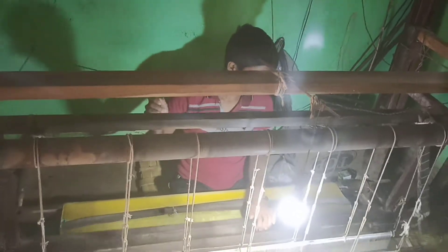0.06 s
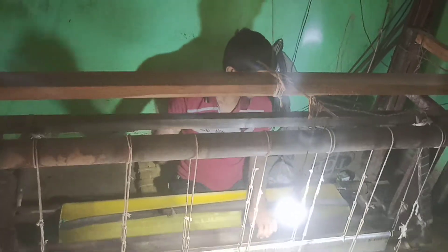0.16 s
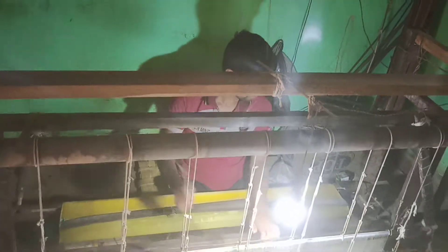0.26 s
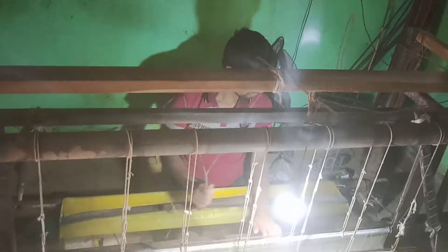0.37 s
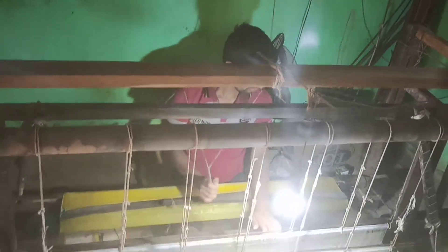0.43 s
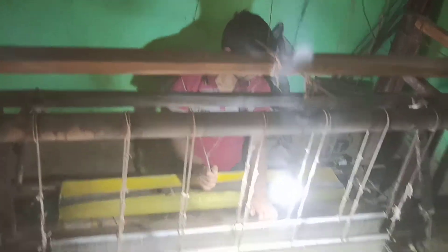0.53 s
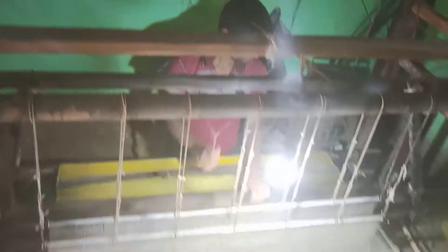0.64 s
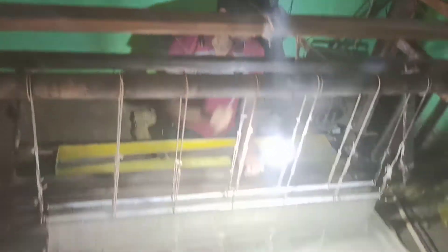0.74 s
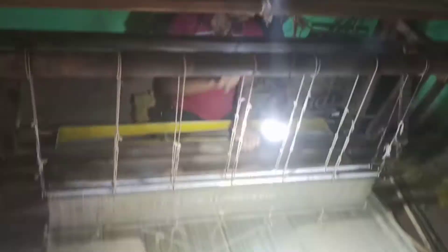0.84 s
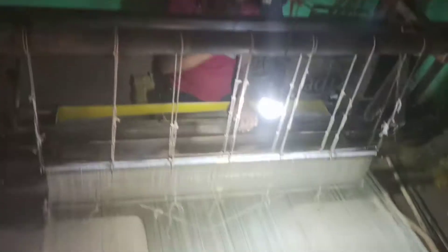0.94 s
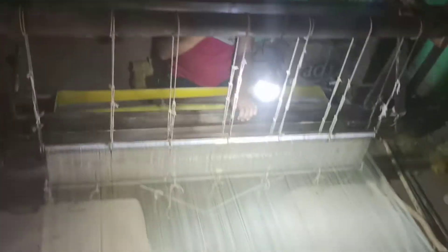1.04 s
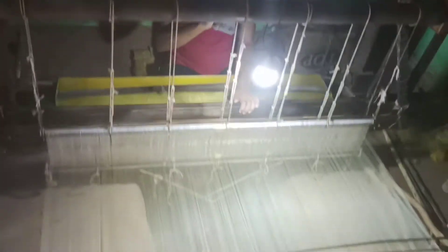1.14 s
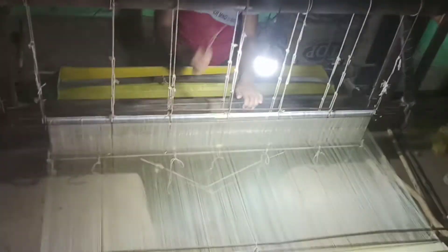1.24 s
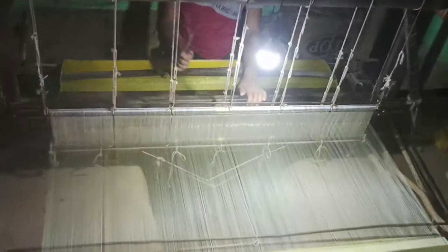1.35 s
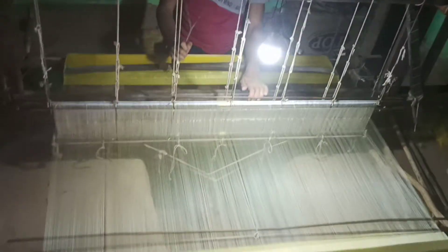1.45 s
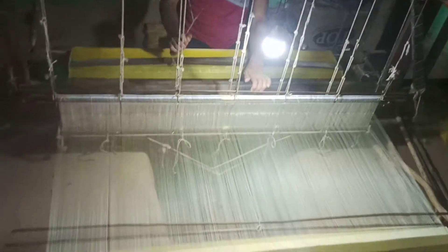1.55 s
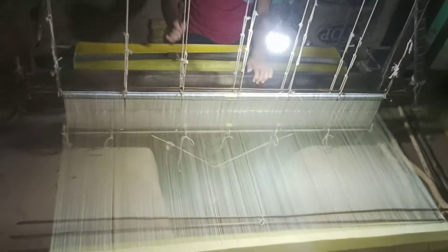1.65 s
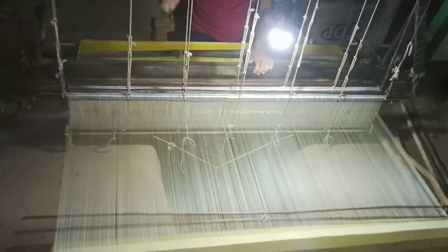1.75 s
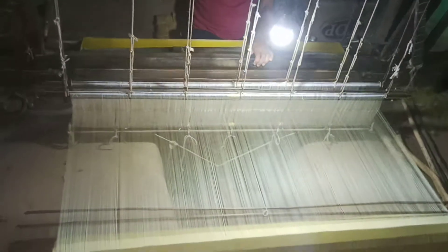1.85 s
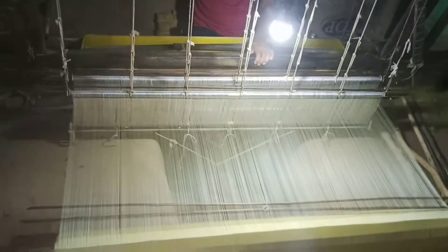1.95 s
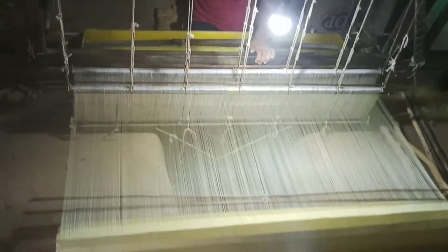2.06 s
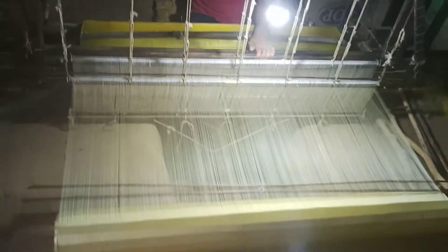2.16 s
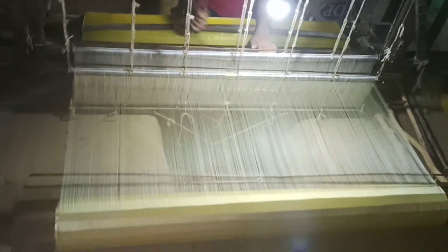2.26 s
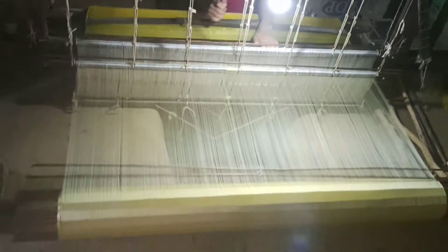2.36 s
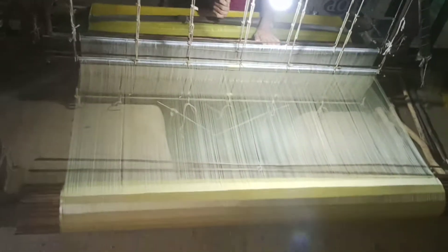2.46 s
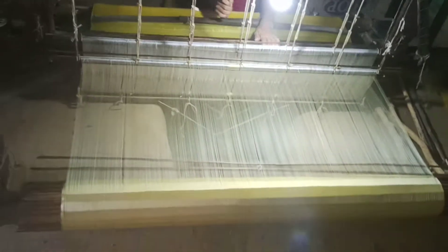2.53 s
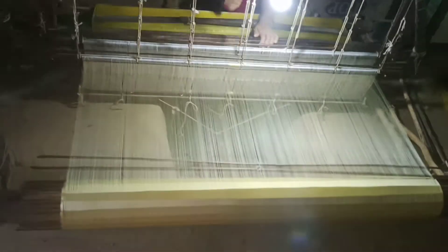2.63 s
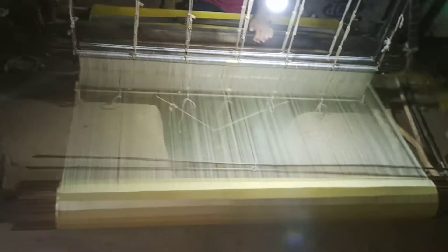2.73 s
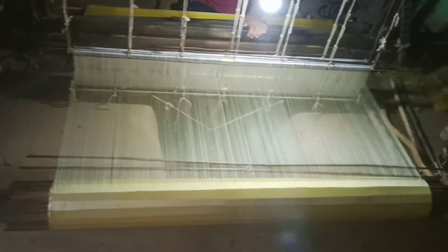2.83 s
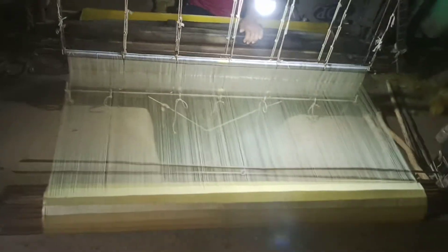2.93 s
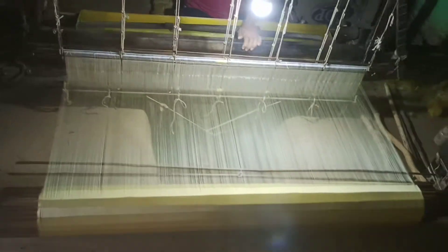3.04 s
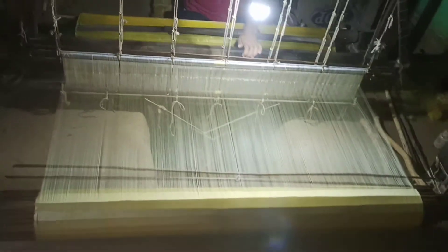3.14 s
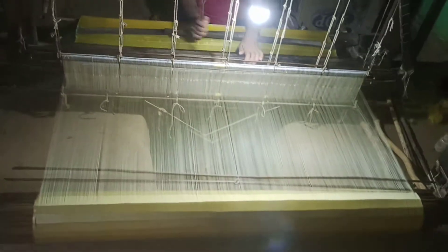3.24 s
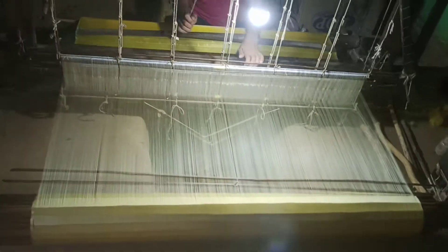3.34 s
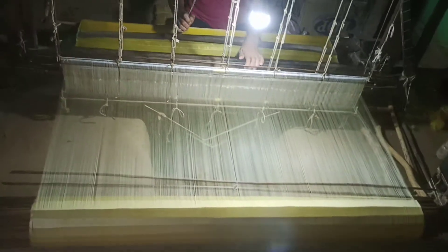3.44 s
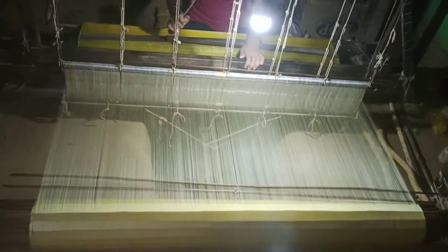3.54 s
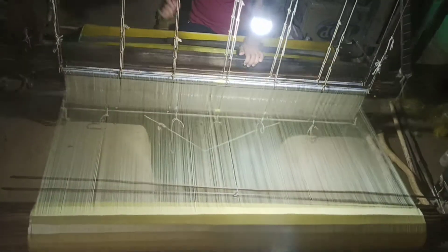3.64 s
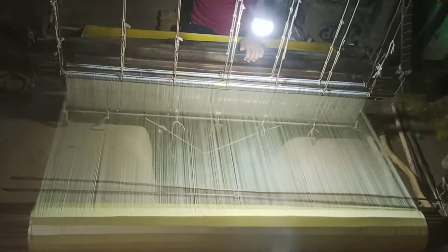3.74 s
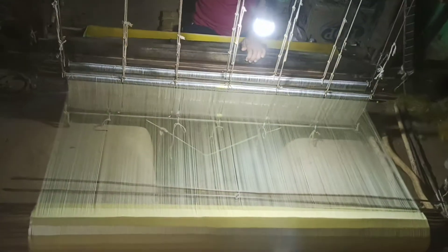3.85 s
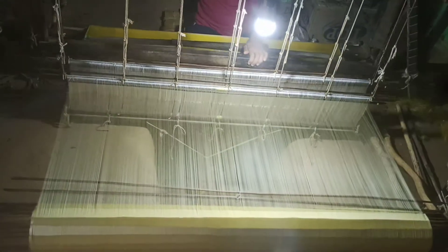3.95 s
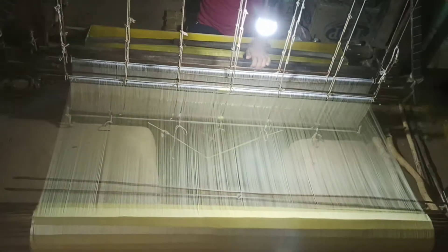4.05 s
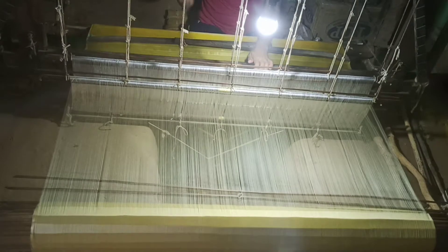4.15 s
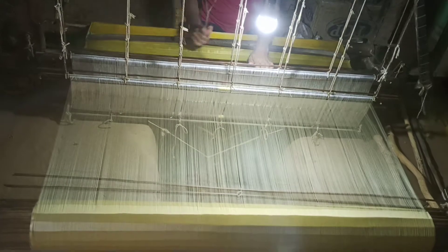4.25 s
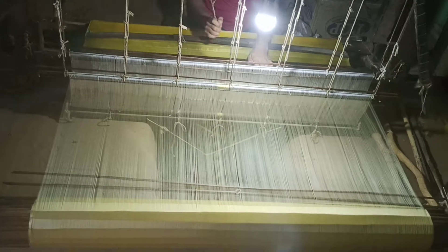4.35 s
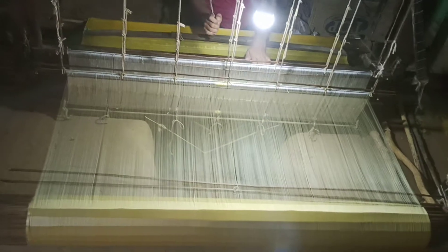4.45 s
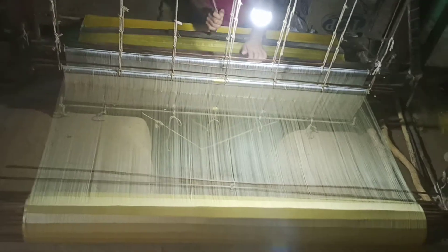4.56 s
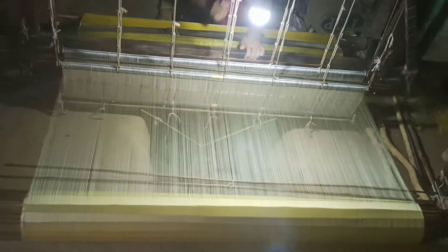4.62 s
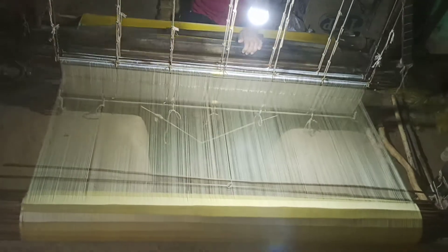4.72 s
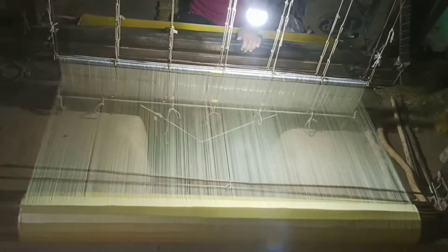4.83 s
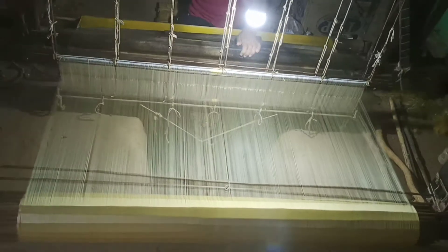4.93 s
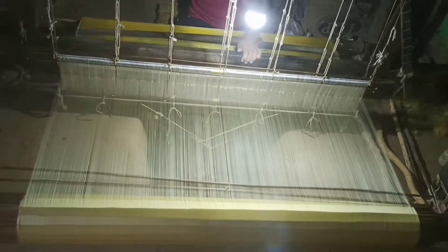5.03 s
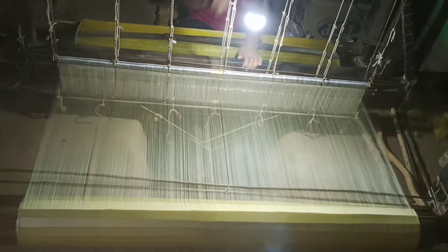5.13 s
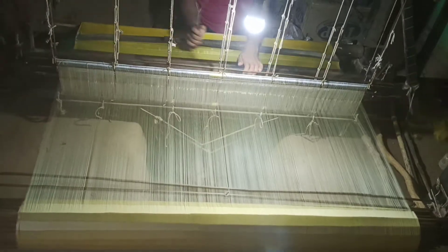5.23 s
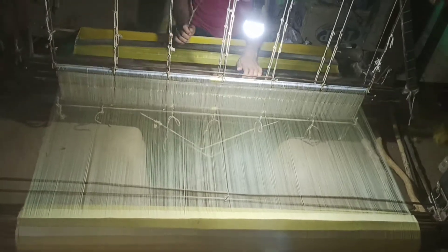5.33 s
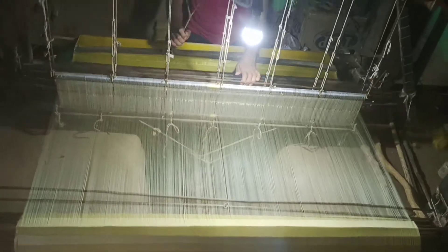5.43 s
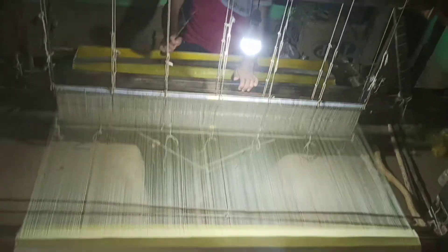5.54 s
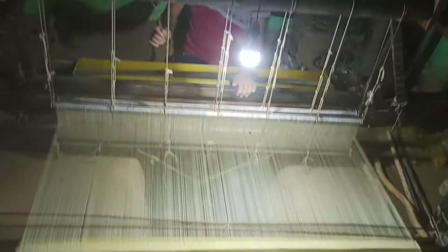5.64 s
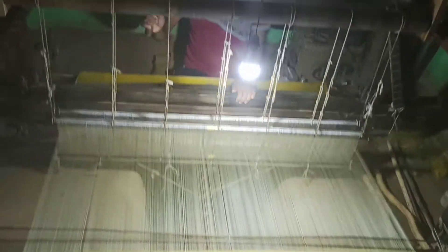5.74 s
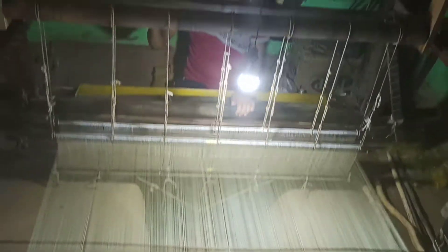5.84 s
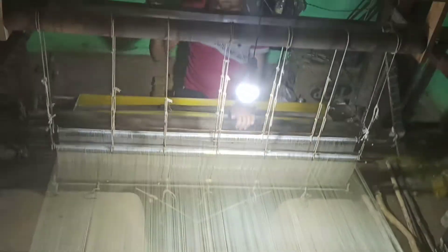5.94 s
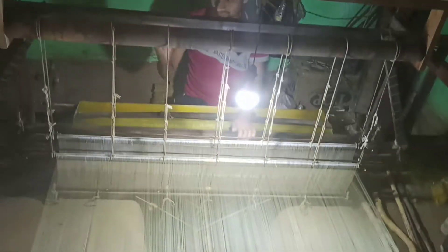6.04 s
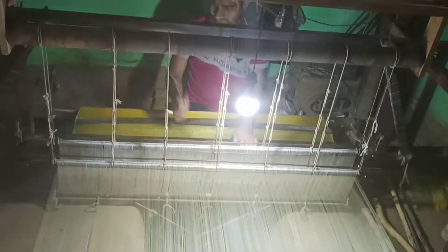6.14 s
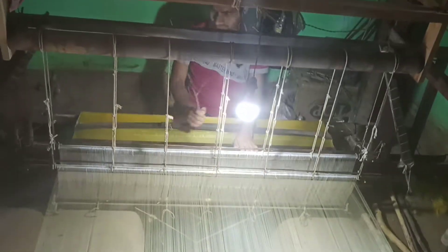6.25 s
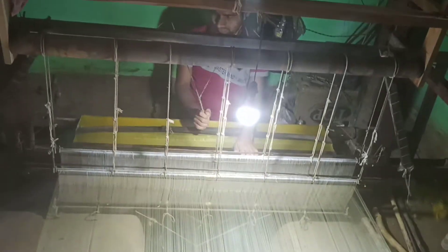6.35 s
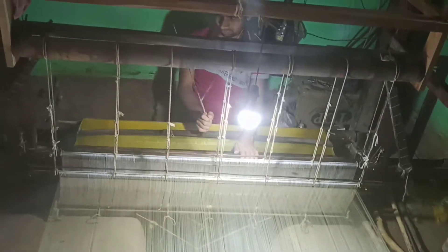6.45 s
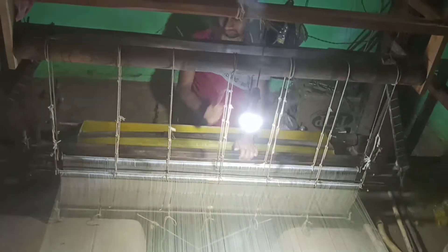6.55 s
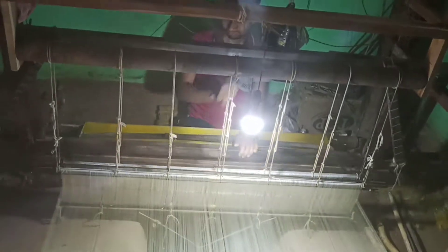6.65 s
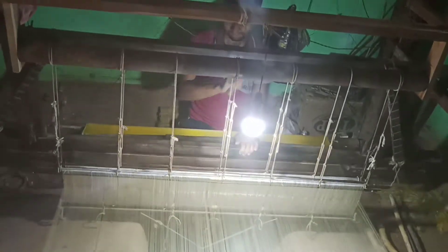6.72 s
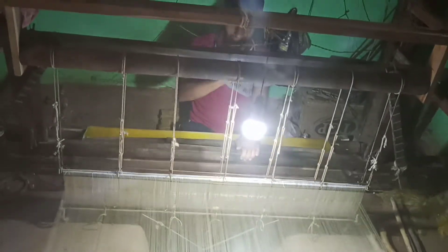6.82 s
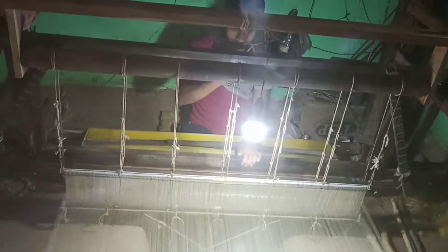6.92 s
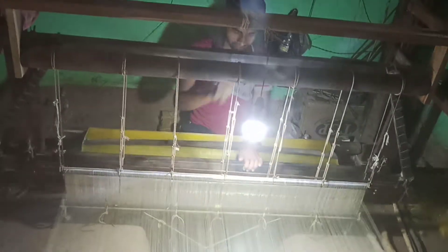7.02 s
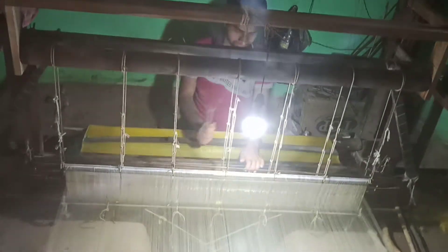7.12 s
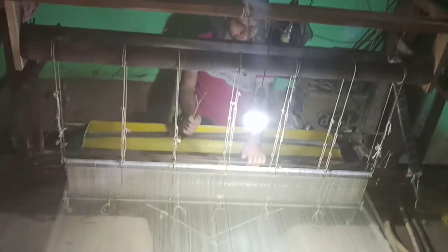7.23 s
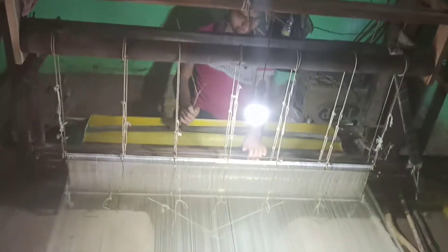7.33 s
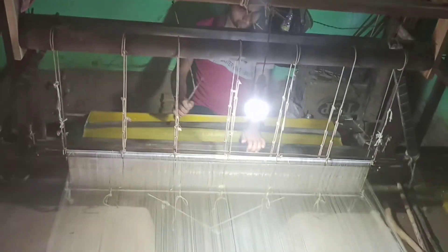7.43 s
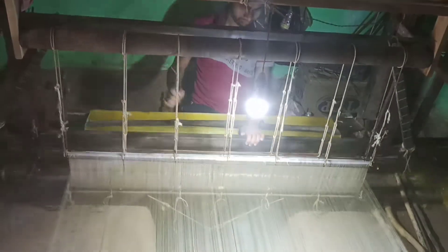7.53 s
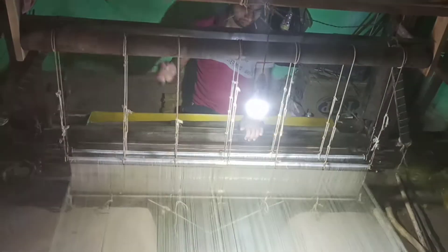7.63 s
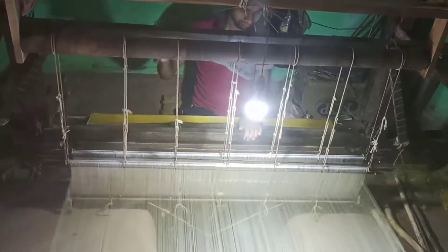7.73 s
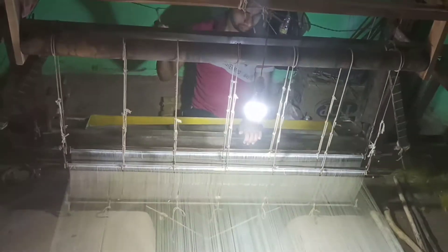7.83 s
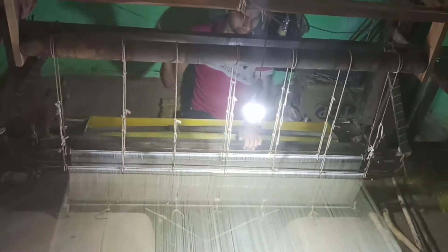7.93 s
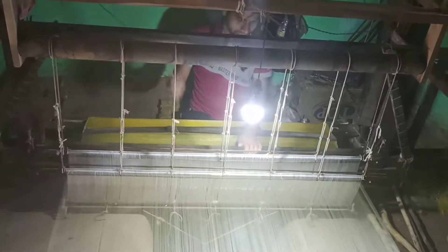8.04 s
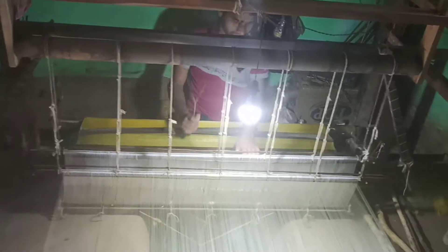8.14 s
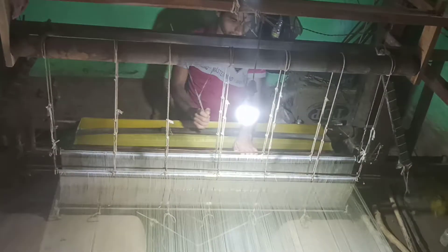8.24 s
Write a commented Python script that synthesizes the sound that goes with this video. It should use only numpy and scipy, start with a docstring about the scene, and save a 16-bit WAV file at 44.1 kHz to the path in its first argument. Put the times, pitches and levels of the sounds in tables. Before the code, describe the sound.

A wooden handloom clacks fast and steadily in a small room, shuttle cracking and slamming about once a second, cords rattling, a distant horn near the end.

```python
"""In a small room a wooden fly-shuttle handloom is worked fast, about one pick a second.
The picker cracks against the shuttle, the shuttle slams into the opposite box, and beater, treadles and harness
knock: each blow is a coloured burst of random contacts with ringing wood and noise echoes. Low modes thump.
Random grains make cords rattle, threads hiss and the shuttle rumble, over a faint noise hush.
A far horn, a stack of sagging harmonics, honks once near the end."""
import sys
import numpy as np
from scipy import signal
from scipy.fft import rfft, irfft
from scipy.io import wavfile
from scipy.ndimage import uniform_filter1d, minimum_filter1d

SR = 44100
rng = np.random.default_rng(int(sys.argv[2]) if len(sys.argv) > 2 else 0)


def put_to_file(sound):
    """Save the sound as 16-bit audio at rate SR, in the file named by the first command-line argument."""
    columns = np.atleast_2d(sound).T  # one column per channel
    safe = np.clip(columns, -1, 1)
    whole_steps = np.round(safe * 32767)
    wavfile.write(sys.argv[1], SR, whole_steps.astype(np.int16))


N = 365148

# Levels in the tables are relative; each layer also has a level of its own.
# colour of the faint steady hush: (frequency [Hz], gain [dB])
HUSH_COLOUR = [(18, -37.5), (30, 7), (43, 1.5), (140, 14.5), (389, 13.5), (518, 9.5), (1970, -1),
               (3070, -10), (4540, 6), (6050, -8.5), (7460, -1.5), (10500, -23.5), (15500, -12)]
HUSH_DB = -59.5

# cords, heddles and running shuttle rattle: (time after pick [s], near throw level [dB], far throw level [dB])
RATTLE_CURVE = [(0.0, -49.5, -49), (0.15, -44.5, -49), (0.24, -49.5, -47), (0.36, -37, -32.5),
                (0.47, -55, -62.5), (0.52, -50.5, -50.5), (0.63, -44, -36), (0.68, -53.5, -55),
                (0.78, -57.5, -55.5), (0.9, -44.5, -52), (0.98, -47.5, -46.5)]
# colour of the rattle: (frequency [Hz], gain [dB])
RATTLE_COLOUR = [(40, -21), (150, 9.5), (500, 3.5), (1900, 0), (4000, -8), (6000, -8), (7500, 1.5),
                 (10500, -20.5), (15300, -2)]
# warp threads hiss under the shuttle: (time after pick [s], near throw level [dB], far throw level [dB])
THREAD_CURVE = [(0.0, -71, -71), (0.1, -65, -60), (0.17, -42, -40), (0.23, -38, -40.5),
                (0.33, -55.5, -46.5), (0.5, -63, -63.5), (0.68, -70, -66), (0.86, -74, -74),
                (0.93, -57, -64), (0.98, -66, -70)]
# colour of the thread hiss: (frequency [Hz], gain [dB])
THREAD_COLOUR = [(5000, -37.5), (9000, -22), (12000, -18.5), (15200, -3.5)]
PICK_PERIOD_S = 0.975   # places one unheard pick before the start

# beater, treadles and harness sticks knock:
# (time [s], level [dB], hardness [dB per octave], chatter t60 [s], stick pitch [Hz])
KNOCKS = [(0.002, -10, 4.3, 0.22, 2420), (0.045, -8.5, -0.5, 0.18, 1560), (0.255, -32, 2, 0.49, 1960),
          (0.324, -39.5, 9, 0.45, 664), (0.368, -16.5, -1.5, .058, 2560), (0.706, -26, -1, .06, 3430),
          (0.825, -29, -3, 0.17, 1400), (0.903, -37, 3, 0.24, 2130), (0.963, -19.5, 1, 0.21, 2180),
          (0.976, -15.5, 5.5, 0.055, 4800), (1.012, -12, 3.5, 0.14, 1570), (1.209, -44, -3, .12, 1440),
          (1.228, -36.5, -2.5, 0.32, 1470), (1.257, -20.5, -0.7, 0.33, 1780),
          (1.652, -19.5, 10, 0.16, 4220), (1.798, -18.5, -3, .22, 1920), (1.894, -26.5, 2.2, 0.41, 1460),
          (1.95, -8, 4.5, 0.19, 4660), (2.011, -18, 2, 0.22, 1570), (2.058, -25.5, -7, 0.12, 1470),
          (2.329, -19.5, -1, 0.055, 4150), (2.597, -34, 2, 0.27, 1620), (2.734, -11, -0.5, .25, 2150),
          (2.778, -16.5, 5.5, 0.12, 1830), (2.871, -30, 1.5, 0.42, 1396), (2.914, -18.5, 12, 0.1, 7450),
          (2.921, -18.5, 0.5, 0.18, 1350), (2.971, -27.5, 2, 0.24, 3830), (3.175, -39, 0, 0.39, 1450),
          (3.21, -33, -2.5, 0.53, 1850), (3.501, -36, 13, 0.11, 1940), (3.571, -40, -15, 0.1, 1680),
          (3.747, -21, -2, .3, 1950), (3.857, -23, 4, .27, 1340), (3.878, -14.5, 2.5, 0.34, 1270),
          (3.941, -11.5, -1.1, 0.18, 1450), (4.2, -39.5, -1.5, 0.42, 1970),
          (4.267, -29.5, -1.5, 0.35, 1220), (4.303, -12, -5, 0.057, 1590), (4.625, -22, 0.5, 0.66, 1390),
          (4.766, -18.5, -.5, 0.13, 1740), (4.854, -33, 0.5, 0.51, 1430), (4.877, -27, 14, 0.25, 1860),
          (4.888, -15, 4.5, .15, 865), (4.926, -19.5, -2, .094, 1600), (4.95, -19.5, 2, 0.18, 3900),
          (5.161, -33, 0, 0.21, 1380), (5.185, -32, 1.5, 0.4, 1400), (5.198, -27, 0, .069, 4720),
          (5.581, -30.5, 6, 0.66, 4580), (5.731, -17.5, -1, 0.18, 1400), (5.839, -28.5, 4.5, 0.52, 1580),
          (5.857, -16, 1, 0.1, 1430), (5.876, -17.5, 1, 0.28, 1370), (5.93, -14, -1.2, 0.17, 2000),
          (6.133, -31.5, 1, 0.32, 2000), (6.216, -29, -5.5, 0.2, 1390), (6.244, -11.5, -2.5, 0.047, 1080),
          (6.424, -33, -13.5, 0.35, 810), (6.479, -47, -8, 0.18, 805), (6.557, -24.5, 1, 0.16, 1670),
          (6.643, -15.5, -2.5, 0.21, 1880), (6.68, -14.5, 4.5, 0.17, 1660), (6.78, -30.5, 0, 0.33, 1390),
          (6.823, -16.5, 3, 0.22, 750), (6.871, -20.5, -3.5, 0.3, 1670), (7.11, -28, 1, 0.3, 2290),
          (7.179, -30, 12, 0.16, 760), (7.419, -33.5, 13, 0.063, 1890), (7.522, -25, 7, 0.46, 2930),
          (7.61, -16, -6.5, 0.18, 1830), (7.676, -15.5, -0.5, 0.13, 1900), (7.73, -30, -1.5, 0.27, 1340),
          (7.782, -26, 5, .16, 1880), (7.79, -18, 1.5, 0.18, 1180), (7.808, -15.5, 1, 0.24, 1960),
          (7.853, -12, 0.5, 0.17, 1440), (7.868, -16, -1.5, 0.12, 1740), (8.067, -28, 2.5, 0.34, 1910),
          (8.182, -12.5, -4, 0.055, 1150)]
# colour of the knocks: (frequency [Hz], gain [dB])
KNOCK_COLOUR = [(35, -65.5), (60, -9.5), (159, -6), (335, -4), (403, 0.5), (497, -11), (585, 0),
                (999, -3.5), (1420, 3), (2910, -6), (4420, -7), (5580, -18), (7900, -19), (10700, -46),
                (12500, -46), (15500, -41.5)]
STICK_DB, STICK_PER_LEVEL_DB = -37.5, -0.41   # light knocks ring more clearly
WEIGHT_DB, WEIGHT_PER_HARDNESS_DB = -3.5, 2.1   # hard knocks carry more bass

# the treadles thump the heavy frame: (time [s], level [dB])
THUMPS = [(0.05, -33.5), (0.977, -35), (1.942, -26), (2.922, -26.5), (3.872, -28.5), (4.888, -25),
          (5.857, -29), (6.824, -26.5), (7.8, -27.5)]
# low modes of the frame's beams: (frequency [Hz], level [dB], t60 [s])
FRAME_MODES = [(77, -16, 0.74), (136, -12.5, 0.51), (178, -9, 0.27), (404, -10, 0.32)]
PICK_THUMP_DB = -53   # each pick jolts the frame too, this far under the pick's own level

# picker strikes the shuttle, near side first, then in turn:
# (time [s], level [dB], stick pitch [Hz], stick ring [dB])
PICKS = [(0.402, 2, 2770, -26.5), (1.376, 2.5, 4200, -19), (2.36, 1, 1270, -39), (3.316, 3.5, 4170, -27),
         (4.332, 1.5, 4020, -42), (5.301, 1.5, 4200, -33), (6.274, 1.5, 5300, -22), (7.236, 1, 4360, -45),
         (8.214, 2, 5160, -27)]
# near and far picker: (hardness [dB per octave], chatter t60 [s], bass weight [dB])
PICKERS = [(-2, 0.076, -6), (-1, 0.073, -3)]
# colour of the picks: (frequency [Hz], gain [dB])
PICK_COLOUR = [(35, -78.5), (60, -16.5), (231, -14), (413, -10.5), (546, -13.5), (1230, -5), (1350, -7),
               (2200, -0.5), (2780, -4), (4120, 2), (5710, -3), (7900, 2.5), (9970, -12), (11500, -16.5),
               (15500, -5)]
# ringing of the struck picker: (frequency [Hz], level [dB], t60 [s])
PICKER_MODES = [(841, -7, 0.034), (1920, -13, .01), (2920, -12.5, 0.015), (4300, 5, 0.03),
                (7570, -1.5, 0.0046), (15200, -20, .004)]

# colour of the shuttle rumbling along the race: (frequency [Hz], gain [dB])
RUMBLE_COLOUR = [(60, -25.5), (150, 8.5), (400, -14), (800, -1.5), (1500, -11.5), (3000, -30.5)]
RUMBLE_DB = -54.5

# shuttle lands in the opposite box: (time [s], level [dB], stick pitch [Hz], stick ring [dB])
LANDINGS = [(0.708, 1, 1740, -36.5), (1.692, -1.5, 1290, -23), (2.666, -3, 1900, -28),
            (3.638, 0, 4370, -27.5), (4.647, -2, 948, -30), (5.621, 3, 1850, -55), (6.577, -4.5, 1624, -25),
            (7.562, 1.5, 2330, -31)]
# the two boxes, in turn: (hardness [dB per octave], chatter t60 [s], bass weight [dB])
BOXES = [(-1, 0.18, -26.5), (1.27, 0.14, 12)]
# colour of the landings: (frequency [Hz], gain [dB])
LANDING_COLOUR = [(35, -66.5), (60, -79.5), (163, -56.5), (443, -25), (688, -0.5), (999, -1.5), (1670, 2),
                  (2200, -2), (4030, -4.5), (6410, -10.5), (7370, -5.5), (10900, -30), (12300, -31.5),
                  (14100, -14), (15500, -19)]
# ringing wood of landings and knocks: (frequency [Hz], level [dB], t60 [s])
BOX_MODES = [(415, -16.5, 0.073), (760, -17.5, 0.017), (1053, -1.5, 0.047), (1220, -3, 0.0076),
             (1704, -9, 0.16), (1860, -0.5, 0.0055), (2590, -7, 0.033), (4860, -1, 0.025)]

# far horn's harmonics: (multiple of the fundamental, level [dB])
HORN_HARMONICS = [(4, -22), (5, -13), (6, -17), (7, -7), (8, 2.5), (9, -11), (10, -7.5), (11, -24),
                  (13, -16), (15, -15)]
HORN_START_S, HORN_HOLD_S, HORN_ATTACK_S, HORN_RELEASE_S = 7.895, 0.29, 0.025, 0.03
HORN_START_HZ, HORN_SAG_HZ_PER_S = 354.5, 24
HORN_DB, HORN_SAG_DB_PER_S = -51.5, 18

# decay of the room's echoes by band: (from [Hz], to [Hz], t60 [s])
ROOM_BANDS = [(0, 500, 0.45), (527, 3000, 0.3), (3100, 29000, 0.27)]
ROOM_DB, ROOM_BUILD_S = -11.5, 0.0057

BLOW = SR * 2 // 5   # samples in one blow
PICK_GRAIN_DB, GRAIN_DB = 2, 4   # each blow meets the wood elsewhere: random bumps in its colour
TICK_DB, TICK_S = -21.5, 0.002   # bright first touch of a blow

GATE_DB, FULL_DIP_DB, LEVEL_WINDOW_S = -48.5, 7, 0.022   # a third of the full dip at GATE_DB
DUCK_FROM_DB, DUCK_SHARE, LOOK_AHEAD_S = -30, 0.13, 0.051   # share of each dB above the threshold
MIC_LOW_HZ, CUTOFF_HZ = 60, 15900


def from_db(db):
    """Decibels to amplitude."""
    return 10 ** (np.asarray(db) / 20)


def rms_one(x):
    """Scale the last axis to rms 1."""
    return x / np.sqrt(np.mean(x ** 2, axis=-1, keepdims=True) + 1e-20)


def at_hz(points, hz):
    """Read a spectrum on a log-frequency axis."""
    points = np.array(points)
    return np.interp(np.log(hz), np.log(points[:, 0]), points[:, 1])


def colour_gain(size, spectrum, tilt_db=0, weight_db=0, bumps_db=np.zeros((1, 2))):
    """Gain per FFT bin: a spectrum, a tilt about 2 kHz, a bass shelf and bumps spread over the octaves."""
    hz = np.maximum(np.arange(size // 2 + 1) * SR / size, 20)
    tilt = tilt_db * np.log2(np.clip(hz, 600, 12000) / 2000)
    bass = weight_db / (1 + (hz / 500) ** 4)
    places = np.log(np.geomspace(300, 7000, bumps_db.shape[1]))
    bumps = np.array([np.interp(np.log(hz), places, row, left=0, right=0) for row in bumps_db])
    return from_db(at_hz(spectrum, hz) + (tilt + bass) + bumps)


def filtered(x, gain):
    """Shape the last axis by a gain per FFT bin; rms 1."""
    return rms_one(irfft(rfft(x) * gain, x.shape[-1]))


def coloured(x, spectrum):
    """Shape a steady sound by a spectrum; rms 1."""
    return filtered(x, colour_gain(len(x), spectrum)[0])


def grains(shape, per_s, spread_db):
    """Random small contacts of uneven size and sign."""
    size_db = spread_db * np.minimum(rng.exponential(1, shape), 4)
    signs = rng.choice([-1, 1], shape)
    return from_db(size_db) * signs * (rng.random(shape) < per_s / SR)


def ring(force, hz, t60):
    """A resonator: a unit click sets a wave of height 1 ringing; nothing passes far below the mode."""
    r, w = from_db(-60 / (t60 * SR)), 2 * np.pi * hz / SR
    return signal.lfilter([0.5, 0, -0.5], [1, -2 * r * np.cos(w), r * r], force + 1e-18)


def hush():
    """Faint steady background: coloured Gaussian noise."""
    return from_db(HUSH_DB) * coloured(rng.standard_normal(N), HUSH_COLOUR)


def through_pick(rows):
    """A level curve that starts afresh at every pick, one column for each side."""
    picks = np.array([PICKS[0][0] - PICK_PERIOD_S] + [pick[0] for pick in PICKS])
    t = np.arange(N) / SR
    last = np.searchsorted(picks, t, side="right") - 1
    since = t - picks[last]
    after_s, near_db, far_db = np.transpose(rows)
    near_throw = last % 2
    return np.where(near_throw, np.interp(since, after_s, near_db), np.interp(since, after_s, far_db))


def rattle():
    """Cords and heddles rattle as dense small ticks that swell and fade through each pick."""
    ticks = grains(N, per_s=2500, spread_db=2.4)
    return from_db(through_pick(RATTLE_CURVE)) * coloured(ticks, RATTLE_COLOUR)


def threads():
    """Warp threads hiss through very fine, dense friction grains, all treble."""
    friction = grains(N, per_s=9000, spread_db=2.5)
    return from_db(through_pick(THREAD_CURVE)) * coloured(friction, THREAD_COLOUR)


def room(shape):
    """The walls answer with a dense swarm of echoes: noise that builds up, then dies band by band."""
    t = np.arange(shape[1]) / SR
    hz = np.arange(shape[1] // 2 + 1) * SR / shape[1]
    swarm = rfft(rng.standard_normal(shape))
    echoes = np.zeros(shape)
    for low_hz, high_hz, t60 in ROOM_BANDS:
        band = irfft(swarm * (hz >= low_hz) * (hz < high_hz), shape[1])
        echoes += from_db(-60 * t / t60) * band
    return (1 - np.exp(-t / ROOM_BUILD_S)) * echoes


def blows(table, colour, modes, rise_s, crack_db, ring_db, contacts_per_s, grain_db):
    """Each blow is a dying chatter of loose wood and its echoes: a broad crack plus the ringing it drives."""
    s, level_db, hardness, t60, stick_hz, stick_db, weight_db = np.transpose(table)[:, :, None]
    t = np.arange(BLOW) / SR
    envelope = (1 - np.exp(-t / rise_s)) ** 2 * from_db(-60 * t / np.maximum(t60, 0.01))
    chatter = grains((len(table), BLOW), contacts_per_s, spread_db=1.3)
    bumps = grain_db * rng.standard_normal(size=(len(table), 40))
    gain = colour_gain(BLOW, colour, hardness, weight_db, bumps)
    tick = from_db(TICK_DB) * np.exp(-t / TICK_S) * rms_one(np.diff(chatter, prepend=0))

    # a longer chatter puts more energy into the room
    echoes = from_db(ROOM_DB) * np.sqrt(10 * t60) * room(chatter.shape)
    echo_rms = np.sqrt(np.mean(echoes ** 2, axis=-1, keepdims=True))
    # colour the echoes 64 samples late, keeping their loudness
    coloured_echoes = filtered(np.roll(echoes, 64, axis=-1), gain) * echo_rms
    sound = from_db(crack_db) * (envelope * filtered(chatter, gain) + coloured_echoes + tick)

    force = envelope * rms_one(chatter) + echoes
    for hz, mode_db, mode_t60 in modes:
        # every blow lands on another spot; hardness tilts the modes about 2 kHz
        spot_db = rng.normal(0, 1.9, s.shape)
        strength = from_db(ring_db + mode_db + hardness * np.log2(hz / 2000) + spot_db)
        sound = sound + strength * ring(force, hz, mode_t60)

    out = np.zeros(N + BLOW)
    for k, start in enumerate((s[:, 0] * SR).astype(int)):
        pitch = stick_hz[k, 0]
        stick = from_db(stick_db[k]) * ring(force[k], pitch, 15 / pitch)   # dies by 60 dB in 15 cycles
        out[start:start + BLOW] += from_db(level_db[k]) * (sound[k] + stick)
    return out[:N]


def knocks():
    """Beater, treadles and harness knock: stick ring follows strength, bass weight follows hardness."""
    table = []
    for s, db, hardness, t60, hz in KNOCKS:
        stick_db = STICK_DB + STICK_PER_LEVEL_DB * db
        weight_db = WEIGHT_DB + WEIGHT_PER_HARDNESS_DB * hardness
        table.append((s, db, hardness, t60, hz, stick_db, weight_db))
    return blows(table, KNOCK_COLOUR, BOX_MODES, rise_s=0.00047, crack_db=-8.5, ring_db=-55.5,
                 contacts_per_s=3000, grain_db=GRAIN_DB)


def frame():
    """Treadles and picks push the beams' low modes into swinging, softened by a one-pole low-pass."""
    jolts = [(pick[0], pick[1] + PICK_THUMP_DB) for pick in PICKS]
    s, level_db = np.transpose(list(THUMPS) + jolts)
    out = np.zeros(N)
    for hz, mode_db, t60 in FRAME_MODES:
        pushes = np.zeros(N)
        pushes[(s * SR).astype(int)] = from_db(level_db + mode_db + rng.normal(0, 0.45, len(s)))
        out += ring(pushes, hz, t60)
    return signal.lfilter([0.03], [1, -0.97], out)


def by_side(events, sides):
    """Events fall on the two sides in turn and take that side's build."""
    table = []
    for k, (s, db, hz, stick_db) in enumerate(events):
        hardness, t60, weight_db = sides[k % 2]
        table.append((s, db, hardness, t60, hz, stick_db, weight_db))
    return table


def picks():
    """The picker cracks against the shuttle: a fast chatter that rings the picker's short modes."""
    return blows(by_side(PICKS, PICKERS), PICK_COLOUR, PICKER_MODES, rise_s=0.0006, crack_db=-2,
                 ring_db=-42, contacts_per_s=5400, grain_db=PICK_GRAIN_DB)


def rumble():
    """The shuttle's uneven rolling contacts swell and fade between near-side picks and their landings."""
    t = np.arange(N) / SR
    flights = np.zeros(N)
    for pick, landing in zip(PICKS[::2], LANDINGS[::2]):
        progress = np.clip((t - pick[0]) / (landing[0] - pick[0]), 0, 1)
        flights += np.sin(np.pi * progress)
    rolling = grains(N, per_s=730, spread_db=3)
    return from_db(RUMBLE_DB) * flights * coloured(rolling, RUMBLE_COLOUR)


def landings():
    """The shuttle slams into the box: a slower-rising chatter that rings the box wood."""
    return blows(by_side(LANDINGS, BOXES), LANDING_COLOUR, BOX_MODES, rise_s=0.0016, crack_db=-8,
                 ring_db=-40, contacts_per_s=4000, grain_db=GRAIN_DB)


def horn():
    """A slightly sagging, buzzing stack of harmonics, loudest at the ring of the diaphragm."""
    t = np.arange(N) / SR - HORN_START_S
    phase = 2 * np.pi * (HORN_START_HZ - HORN_SAG_HZ_PER_S * t / 2) * t
    stack = np.zeros(N)
    for multiple, level_db in HORN_HARMONICS:
        stack += from_db(level_db) * np.sin(multiple * phase + rng.uniform(0, 2 * np.pi))
    attack = np.clip(t / HORN_ATTACK_S, 0, 1)
    release = np.clip(1 + (HORN_HOLD_S - t) / HORN_RELEASE_S, 0, 1)
    return attack * release * from_db(HORN_DB - HORN_SAG_DB_PER_S * np.clip(t, 0, 1)) * stack


def scene():
    """The loom in its room over a faint hush, with the far horn."""
    steady = hush() + rattle() + threads()
    loom = knocks() + frame() + picks() + rumble() + landings()
    return (steady + loom + horn())[None]


def record(dry):
    """A suppressor dips quiet gaps, gain control ducks from just ahead of loud blows;
    peaks are rounded, deep bass and top are cut."""
    level_db = 10 * np.log10(uniform_filter1d(dry ** 2, round(LEVEL_WINDOW_S * SR)) + 1e-12)
    dip_db = -FULL_DIP_DB / (1 + 2 * np.exp((level_db - GATE_DB) / 2))
    ahead = round(LOOK_AHEAD_S * SR)
    # loudest level within the look-ahead
    coming_db = -minimum_filter1d(-level_db, ahead, origin=-(ahead // 2))
    duck_db = -DUCK_SHARE * np.maximum(coming_db - DUCK_FROM_DB, 0)
    rounded = 0.9 * np.tanh(dry * from_db(dip_db + duck_db) / 0.9)
    bass_cut = signal.butter(3, MIC_LOW_HZ, "high", fs=SR, output="sos")
    top_cut = signal.cheby2(24, 80, CUTOFF_HZ, fs=SR, output="sos")
    return signal.sosfilt(top_cut, signal.sosfilt(bass_cut, rounded))


dry = scene()
out = record(dry)
put_to_file(out)
```